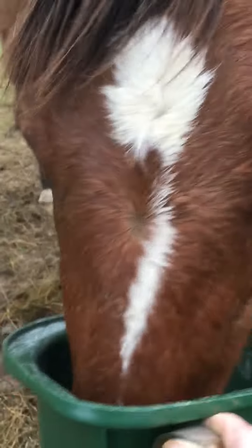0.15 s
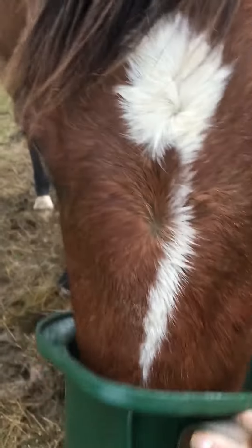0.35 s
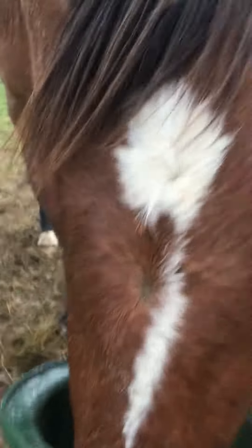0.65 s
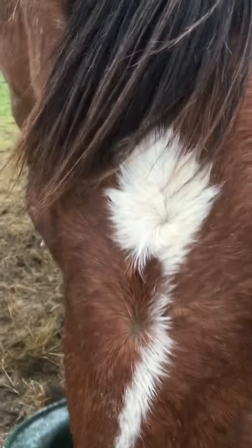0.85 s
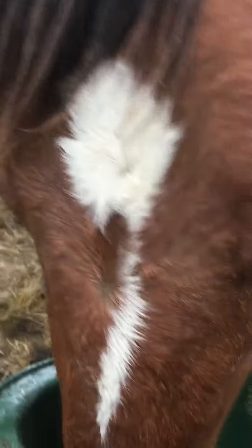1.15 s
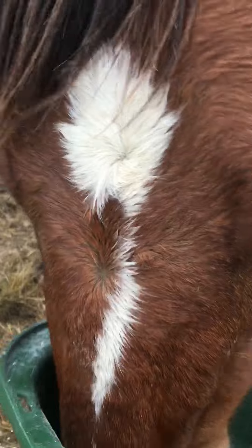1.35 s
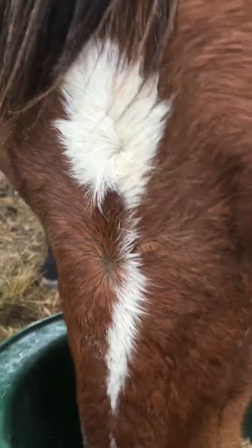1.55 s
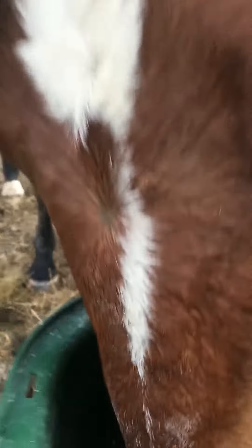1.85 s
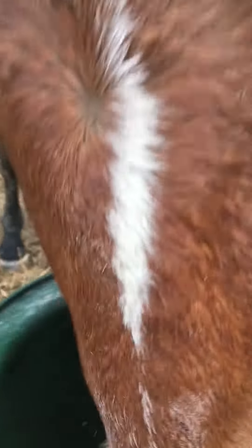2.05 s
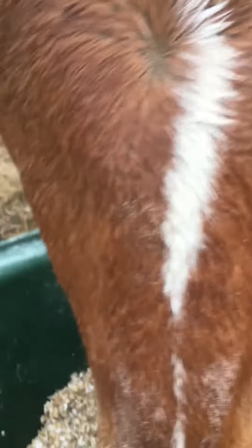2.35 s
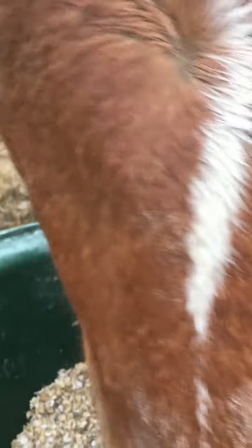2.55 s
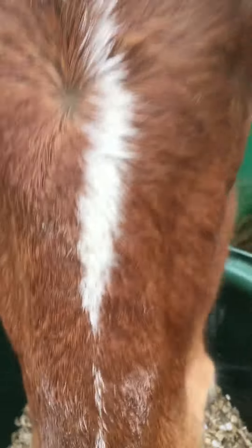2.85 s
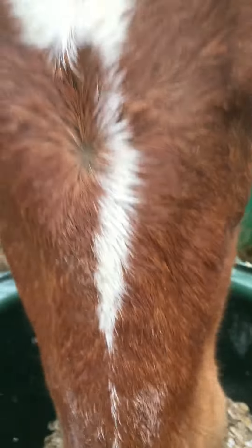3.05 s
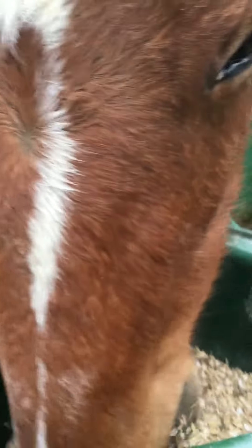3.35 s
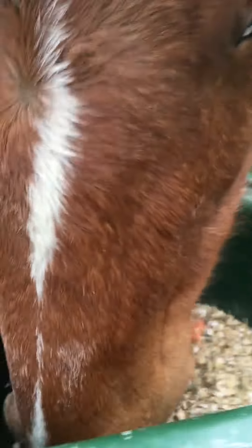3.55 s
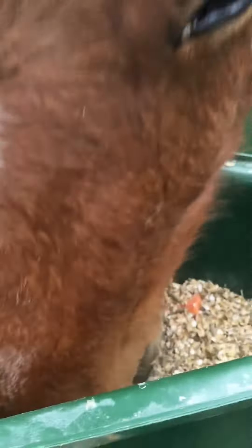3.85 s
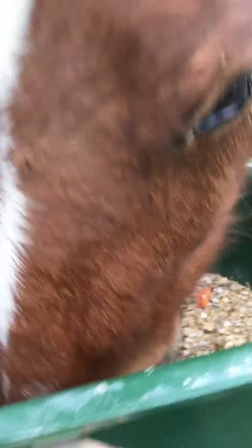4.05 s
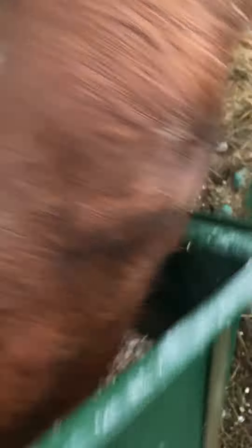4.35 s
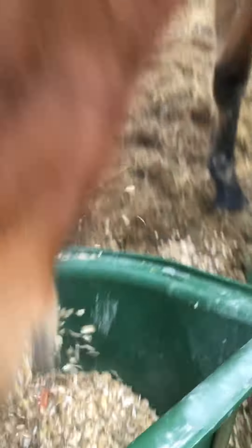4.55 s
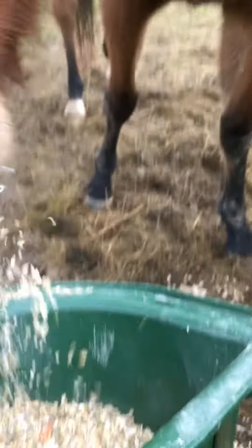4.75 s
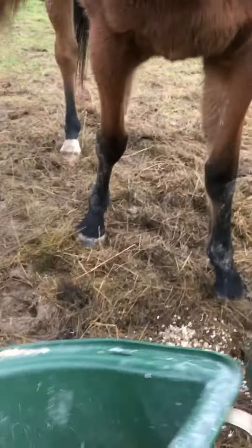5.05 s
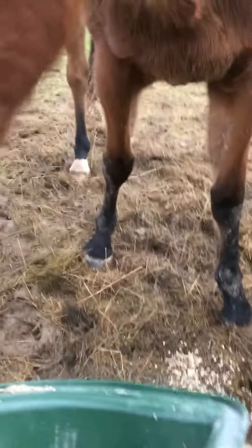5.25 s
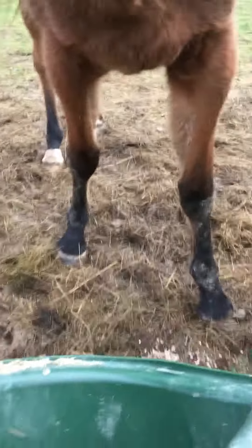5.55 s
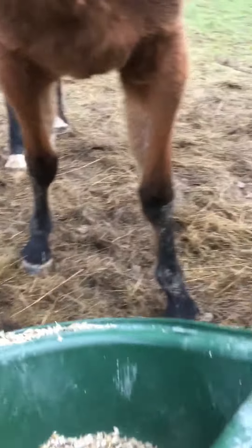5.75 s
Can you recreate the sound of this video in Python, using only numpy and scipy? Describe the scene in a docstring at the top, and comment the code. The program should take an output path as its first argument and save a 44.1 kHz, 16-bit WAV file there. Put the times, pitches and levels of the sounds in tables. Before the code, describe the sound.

A horse eats grain from a plastic bucket in an open field, heard close up over a low outdoor rumble. From the start the grain rustles and scrapes in uneven bursts, kernels snap and tick against the plastic, and the jaw grinds with a low, hollow drone. A cluster of sharp crunches comes near 1.9 seconds. From about 2.3 seconds the muzzle bumps the bucket with dull knocks, clearest at 2.6 and 3.2 seconds, followed by faint wet lip smacks around 3.3 seconds. The loudest knocks fall between 4.2 and 4.4 seconds. At about 4.5 seconds the head lifts out and dropped kernels patter into the bucket, thickest and brightest near 4.85 seconds, then thin to scattered ticks while the chewing goes on softly. From about 5.5 seconds until the end, near 6 seconds, wind gusts buffet the microphone.

```python
"""A horse eats grain from a plastic bucket in an open field, heard close up on a phone microphone.
From the start, over a low outdoor rumble, the grain rustles, kernels snap and tick on the wall and
the grinding jaw drones in the hollow. After two seconds the muzzle bumps the side and the lips smack.
At about 4.5 s the head lifts out, dropped kernels patter down, and last, gusts buffet the microphone."""
import sys
import numpy as np
from scipy import signal
from scipy.io import wavfile
from scipy.ndimage import uniform_filter1d

SR = 44100
rng = np.random.default_rng(int(sys.argv[2]) if len(sys.argv) > 2 else 0)


def to_wav(sig):
    """Store sig (one row per channel, or 1-D mono) as 16-bit WAV at the path in sys.argv[1].

    Samples outside -1..1 are clipped; the rate is SR.
    """
    pcm = np.clip(np.atleast_2d(sig), -1, 1) * 32767
    pcm = np.round(pcm).astype(np.int16)
    wavfile.write(sys.argv[1], SR, pcm.T)  # frames by channels


N = 259742

# Modes of the bucket's wall. Each row: pitch in Hz, level in dB, time to fall 60 dB in seconds.
WALL_MODES = [(140.2, 5.5, 0.095), (182.5, 4.5, 0.14), (220, 6, .1), (325, 2.5, 0.13), (503, 1.5, 0.052),
              (576, -10.5, 0.16), (959, -4, 0.1), (1217, 3.5, 0.0084), (1583, -8, .009), (2040, -10, 0.008),
              (2616, -6, 0.0097), (3260, 0, 0.011), (4050, -18, .008)]
# Shoves of the muzzle and showers of kernels that move the grain.
# Each row: peak time in seconds, length in seconds, fine hiss in dB, coarse scrape in dB.
GRAIN_SHOVES = [(0.171, 0.035, -57.5, -50.5), (0.322, .118, -55, -47), (0.519, 0.06, -66, -49.5),
                (0.63, .154, -54, -54), (0.765, .045, -72, -46.5), (0.913, 0.1, -50.5, -48.5),
                (1.002, 0.058, -52, -51.5), (1.097, .098, -53, -49.5), (1.192, .075, -53, -57.5),
                (1.4, .26, -52.5, -52.5), (1.594, .178, -47, -54), (1.779, .122, -48.5, -61.5),
                (1.901, .065, -42.5, -40.5), (2.298, .07, -52.5, -54.5), (2.599, .071, -50, -49.5),
                (2.829, 0.15, -49.5, -61), (2.982, .119, -53, -62), (3.218, .105, -45, -53.5),
                (3.403, .164, -52, -58), (3.545, .05, -45.5, -47.5), (3.615, 0.05, -52.5, -53.5),
                (3.8, 0.098, -44.5, -53), (3.938, .089, -52, -51), (4.184, .35, -47, -45),
                (4.363, .07, -46.5, -44), (4.447, .123, -47, -45.5), (4.603, .13, -47, -44.5),
                (4.78, .17, -40, -40.5), (4.845, .04, -45, -42), (4.93, .45, -51.5, -53),
                (5.295, 0.08, -41.5, -51), (5.36, .1, -45.5, -52), (5.531, .118, -70, -56.5),
                (5.637, .052, -68, -48.5), (5.785, .16, -68, -55)]
SETTLED_DB = -57.5, -66.5  # hiss and scrape between shoves


def undb(db):
    """Gain of a level in dB."""
    return 10 ** (np.asarray(db) / 20)


def unit(x):
    """Scaled to rms 1."""
    return x / np.sqrt(np.mean(x ** 2))


def add(out, start_s, x):
    """Mix x into out from start_s on."""
    i = int(start_s * SR)
    out[i:i + len(x)] += x[:len(out) - i]


def band(x, hz, width):
    """Steep resonance: a two-pole band-pass applied twice."""
    b, a = signal.iirpeak(hz, hz / width, SR)
    return signal.lfilter(b, a, signal.lfilter(b, a, x))


def ring(x, peaks):
    """Sum of resonances of alternating sign. Each row: centre in Hz, width in Hz, level in dB."""
    return sum((-1) ** k * undb(db) * band(x, hz, 1.57 * width) / np.sqrt(width)
               for k, (hz, width, db) in enumerate(peaks))


def drift(per_s):
    """Smooth random wander of rms 1, with per_s new values a second."""
    hold = int(SR / per_s)
    steps = np.repeat(rng.standard_normal(N // hold + 1), hold)
    return unit(uniform_filter1d(uniform_filter1d(steps, hold), hold)[:N])


def puffs(per_s, spread_db, tail_ms):
    """Noise in short puffs of unequal size, as when kernels slip or are crushed."""
    onsets = rng.random(N) < per_s / SR
    sizes = undb(np.minimum(spread_db * rng.exponential(size=N), 16))
    envelope = signal.lfilter([1], [1, -np.exp(-1000 / (tail_ms * SR))], onsets * sizes)
    return envelope * rng.standard_normal(N)


def swells(table, rest_db):
    """A curve in dB for each level column: every row rises to its peak and falls over a resting level."""
    rise_share, edge_db, roundness = .42, 7, 1.7
    t = np.arange(0, N / SR + .002, .002)
    power = np.ones((1, len(t))) * undb(2 * np.reshape(rest_db, (-1, 1)))
    for peak_s, length_s, *db in table:
        away = np.maximum((peak_s - t) / rise_share, (t - peak_s) / (1 - rise_share)) / length_s
        power = power + undb(2 * (np.reshape(db, (-1, 1)) - edge_db * away ** roundness))
    return [np.interp(np.arange(N) / SR, t, 10 * np.log10(p)) for p in power]


def head_up():
    """0 while the muzzle is in the bucket, 1 once it is out."""
    return np.interp(np.arange(N) / SR, (4.45, 4.65), (0, 1))


def field_air():
    """The open field: faint broad bands of noise, each wavering a little."""
    # Bands of outdoor noise. Each row: centre in Hz, width in Hz, level in dB.
    air_bands = [(143, 160, -55), (385, 1570, -59.5), (930, 366, -62), (4070, 20000, -62)]
    return sum(undb(db + 2.5 * drift(16)) * unit(band(rng.standard_normal(N), hz, width))
               for hz, width, db in air_bands)


def low_rumble():
    """A wavering low rumble; its strongest swells, gusts that buffet the microphone, reach higher."""
    # Swells of low rumble: the bumped bucket shakes at 4.2 s, then wind gusts after 5 s.
    # Each row: peak time in seconds, length in seconds, level in dB.
    rumble_swells = [(4.2, 0.22, -43), (5.2, 0.23, -41.5), (5.52, 0.07, -33.5), (5.69, 0.13, -28),
                     (5.78, 0.06, -27)]
    # Bands of the rumble and of the buffeting. Each row: centre in Hz, width in Hz, relative level in dB.
    rumble_bands = [(53.6, 13, 10), (80, 27, -2)]
    buffet_bands = [(105, 44, 21), (220, 87, 5)]
    rumble_db = swells(rumble_swells, rest_db=-47.5)[0]
    rumble = unit(ring(rng.standard_normal(N), rumble_bands))
    buffet = unit(ring(rng.standard_normal(N), buffet_bands))
    buffet_db = rumble_db - 14 + 0.48 * (rumble_db + 43) + drift(7.1)
    return rumble * undb(rumble_db) + buffet * undb(buffet_db)


def jaw_drone():
    """Dense grinding thuds ring the bucket's hollow, which sounds higher once the head is out."""
    # Grinds of the jaw. Each row: peak time in seconds, length in seconds, level in dB.
    grinds = [(0.03, 0.049, -40), (0.255, 0.1, -42), (0.38, 0.11, -46), (0.628, 0.11, -50),
              (0.796, 0.12, -43.5), (0.926, 0.11, -43.5), (1.147, 0.095, -47.5), (1.41, 0.18, -39),
              (1.579, 0.23, -46.5), (1.9, 0.11, -43.5), (2.184, 0.055, -42), (2.38, 0.33, -45.5),
              (2.826, 0.12, -46.5), (2.974, 0.26, -49.5), (3.24, 0.07, -44.5), (3.437, 0.14, -40),
              (3.537, 0.08, -36), (3.84, 0.26, -45.5), (4.16, 0.16, -33.5), (4.27, 0.29, -42),
              (4.548, 0.13, -42), (4.773, 0.19, -47.5), (5.019, 0.18, -46), (5.326, 0.27, -49.5)]
    # The hollow with the muzzle in, then out. Each row: centre in Hz, width in Hz, relative level in dB.
    blocked_hollow = [(225.7, 74, -2), (280, 82, -6), (450, 124, -18.5)]
    open_hollow = [(272, 173, 6), (474, 77, -9.5)]
    thuds = puffs(per_s=900, spread_db=2, tail_ms=3.7)
    up = head_up()
    hollow = (1 - up) * unit(ring(thuds, blocked_hollow)) + up * unit(ring(thuds, open_hollow))
    return hollow * undb(swells(grinds, rest_db=-59)[0])


def lip_smacks():
    """Short wet rubs of the lips: narrow noise on a gliding pitch."""
    # Each row: start in seconds, length in ms, first and last pitch in Hz, level in dB.
    rubs = [(3.25, 20, 953, 960, -44), (3.368, 25, 1310, 1980, -42), (3.398, 18.6, 2290, 3060, -41)]
    out = np.zeros(N)
    for start_s, ms, first_hz, last_hz, db in rubs:
        n = int(ms * SR / 1000)
        wobble = unit(uniform_filter1d(rng.standard_normal(n), 40))
        glide = np.sin(2 * np.pi * np.cumsum(np.linspace(first_hz, last_hz, n)) / SR)
        add(out, start_s, undb(db) * np.hanning(n) ** .5 * wobble * glide)
    return out


def muzzle_bumps():
    """Each bump rings the wall modes nearest its pitch; low bending waves are slower and arrive late."""
    # Each row: start in seconds, peak in dB, pitch in Hz, rise in ms, share of the free ring time.
    bumps = [(2.282, -25.5, 222, 4.4, 0.77), (2.314, -24.5, 233, 11, 0.34), (2.589, -17, 176, 3.7, 1),
             (2.598, -10.5, 171, 6, 0.39), (2.879, -22.5, 157, 3.6, 0.37), (3.172, -13, 146, 4.1, 0.44),
             (3.34, -24.5, 131, 4.4, 0.4), (3.535, -31, 248, 7.3, 0.49), (3.752, -27, 165, 4.8, 0.1),
             (4.155, -16.5, 259, 4, 0.2), (4.214, -5.5, 228, 3.1, 0.4), (4.229, -8.5, 175, 4.6, 0.37),
             (4.355, -8, 214, 0.93, 0.6), (5.287, -30, 356, 2.4, 0.98)]
    out, t = np.zeros(N), np.arange(6000) / SR
    for start_s, db, pitch_hz, rise_ms, ring_share in bumps:
        bump = 0
        for hz, mode_db, t60 in WALL_MODES:
            age = np.maximum(t - 0.33 / hz, 0)
            attack = np.sin(np.pi / 2 * np.minimum(age * 1000 / rise_ms * hz / pitch_hz, 1)) ** 2
            octaves = np.log2(hz / pitch_hz)
            # a quicker blow reaches more of the high modes
            near_db = -1.4 * rise_ms ** 2 * max(octaves, 0) + 14 * min(octaves, 0)
            # a muzzle that stays on the wall shortens the ring
            decay_db = 60 * age / (ring_share * t60)
            bump = bump + undb(mode_db + near_db - decay_db) * attack * np.sin(2 * np.pi * hz * age)
        add(out, start_s, undb(db) * bump / np.abs(bump).max())
    return signal.sosfilt(signal.butter(4, 112, "high", fs=SR, output="sos"), out)


def grain_rustle():
    """Fine slips hiss and coarser ones scrape the wall; once the head is up, dropped kernels patter."""
    # Bands of the hiss, of the scrape, and of the colour that the muzzle adds while in the grain.
    # Each row: centre in Hz, width in Hz, relative level in dB.
    hiss_bands = [(6540, 4150, -5.5), (8680, 510, -7.5), (11100, 4400, -0.5), (14750, 1800, -2.5)]
    scrape_bands = [(1376, 650, -6.5), (2480, 750, -7.5), (3610, 4800, -7)]
    muzzle_bands = [(900, 640, -9)]
    hiss_db, coarse_db = swells(GRAIN_SHOVES, SETTLED_DB)
    sift = puffs(per_s=4700, spread_db=1.5, tail_ms=0.74)
    # the colour shifts as the muzzle turns: every band drifts alone
    hiss = unit(sum((-1) ** k * undb(1.5 * drift(5)) * ring(sift, [peak])
                    for k, peak in enumerate(hiss_bands)))
    slips = puffs(per_s=1000, spread_db=3, tail_ms=3.5)
    scrape = unit(ring(slips, scrape_bands) - ring(slips, muzzle_bands))
    patter = unit(ring(puffs(per_s=450, spread_db=4, tail_ms=2), scrape_bands))
    up = head_up()
    coarse = (1 - up) * scrape + up * patter
    return hiss * undb(hiss_db + 1.13 * drift(25.05)) + coarse * undb(coarse_db + 3.66 * drift(10))


def small_kernels(count):
    """Random rows for kernel_clicks, more of them and louder where the grain scrapes harder."""
    coarse_db = swells(GRAIN_SHOVES, SETTLED_DB)[1]
    when, size, pitch, brightness = rng.uniform(-0.72, 1, (count, 4)).T
    odds = np.cumsum(undb(.5 * coarse_db))
    starts = np.minimum(np.searchsorted(odds, abs(when) * odds[-1]), N - 1)
    tick_db = coarse_db[starts] + 10 + 4 * size
    tick_hz = 2200 * 2 ** (.9 * pitch)
    snap_db = tick_db - 4 + 6 * brightness
    return list(zip(starts / SR, tick_db, tick_hz, snap_db))


def kernel_clicks():
    """A kernel snaps with a ragged tail, crumbles against the wall and rings the modes near its pitch."""
    # The loudest kernels. Each row: start in seconds, wall tick in dB, its pitch in Hz, snap in dB.
    loud_kernels = [(0.08, -29, 1790, -34), (0.101, -36.5, 2430, -41), (0.3103, -26, 1750, -11.5),
                    (0.3415, -35, 1550, -21.5), (0.523, -29.5, 2480, -17.5), (0.5386, -31, 2060, -53),
                    (0.5745, -38, 3230, -26), (0.653, -40.5, 3000, -40), (0.7228, -25.5, 1840, -26),
                    (0.7484, -24, 3330, -26), (0.7613, -32, 1390, -36), (0.768, -26.5, 2900, -44),
                    (0.786, -32, 1190, -34), (0.886, -40, 1250, -58), (1.062, -28, 1320, -10),
                    (1.076, -27, 2300, -31), (1.1196, -22.5, 2040, -19), (1.3197, -33, 2930, -53),
                    (1.3718, -20.5, 1540, -26), (1.437, -31.5, 2900, -55), (1.477, -33, 1190, -45),
                    (1.4833, -26, 3930, -14.5), (1.8713, -25, 1370, -21.5), (1.8745, -41, 3500, -29),
                    (1.8886, -19.5, 2180, -24), (1.8928, -22.5, 3000, -17), (1.9069, -22.5, 1430, -44),
                    (1.919, -32, 1450, -16), (1.9255, -24, 1390, -12), (2.281, -33.5, 1450, -50),
                    (2.31, -39, 1280, -57), (2.5281, -39, 3430, -36), (2.7091, -43, 2280, -57),
                    (2.7346, -43, 2000, -53), (2.833, -28, 2980, -50), (2.852, -34, 3130, -40),
                    (3.339, -39, 1470, -45), (3.5314, -32, 970, -39), (3.637, -38.5, 3300, -50),
                    (3.7356, -29.5, 1070, -55), (3.829, -34.5, 1180, -46), (3.869, -36, 2490, -37),
                    (3.895, -35, 1210, -37), (3.937, -27.5, 1240, -29.5), (3.967, -34, 1020, -51),
                    (3.976, -40, 3530, -41), (4.052, -33, 1890, -50), (4.167, -30, 2820, -30),
                    (4.356, -18.5, 890, -47), (4.443, -30, 1320, -25), (4.545, -30, 3000, -37),
                    (4.556, -24.5, 3280, -26), (4.5629, -18, 2520, -21.5), (4.565, -21, 1690, -28),
                    (4.594, -28.5, 1640, -35), (4.606, -27, 1530, -27.5), (4.655, -29.5, 2030, -27),
                    (4.7, -31, 2300, -31), (4.7158, -33, 2800, -20), (4.747, -32, 2210, -39),
                    (4.7578, -28.5, 1400, -15.5), (4.764, -33, 1380, -33), (4.778, -23, 1940, -30),
                    (4.789, -28, 3920, -22), (4.8008, -25, 1590, -42), (4.815, -32, 1700, -31),
                    (4.8293, -32, 3280, -15.5), (4.8364, -32.5, 1360, -22), (4.8493, -21.5, 1330, -8),
                    (4.854, -21, 3050, -5), (4.86, -24.5, 3000, -11.5), (4.886, -44, 3050, -16.5),
                    (4.899, -30.5, 3900, -37), (4.938, -35, 1600, -46), (4.956, -31.5, 2900, -18.5),
                    (4.976, -32, 2600, -50), (4.9937, -47, 2890, -23), (5.0321, -28, 3580, -12),
                    (5.0363, -23, 3600, -9), (5.0725, -36.5, 3500, -32), (5.117, -31.5, 3200, -37),
                    (5.192, -33.5, 3560, -36), (5.258, -41, 4500, -24), (5.276, -30, 4200, -29),
                    (5.2924, -30.5, 3300, -37), (5.359, -42, 4400, -20), (5.4244, -19, 4200, -22),
                    (5.494, -38, 3210, -37), (5.513, -35.5, 2880, -34), (5.6215, -25.5, 1690, -25.5),
                    (5.772, -37, 2490, -28.5)]
    out, t = np.zeros(N), np.arange(1024) / SR
    impulse = signal.unit_impulse(len(t), idx=8)
    for start_s, tick_db, tick_hz, snap_db in loud_kernels + small_kernels(count=45):
        # a snap that stands out more over its tick is also higher
        snap_hz = np.clip(7600 * 2 ** (0.07 * (snap_db - tick_db)), 6400, 14000)
        noise, crumble = rng.standard_normal((2, len(t)))
        crack = impulse + noise * undb(-13) * np.exp(-t / .0004)
        tail = noise * undb(-17.5) * np.exp(-t / .0033)
        snap = band(crack + tail, snap_hz, 1.025 * snap_hz)
        push = impulse + undb(-15) * crumble * np.exp(-t / .003)
        # the weaker the snap, the wetter the bite and the narrower its tick
        wet = np.clip((tick_db - snap_db) / 20, 0, 1)
        tick = undb(-4 - 10 * wet) * band(push, tick_hz, 1.2 * tick_hz)
        for k, (hz, _, _) in enumerate(WALL_MODES[6:]):
            octaves = np.log2(hz / tick_hz)
            near_db = -4 * octaves - (7 + 8 * wet) * abs(octaves)
            spot_hz = hz * (1 + .05 * noise[k])  # each spot on the wall shifts the modes a little
            tick = tick + (-1) ** k * undb(near_db) * band(push, spot_hz, .2 * hz)
        add(out, start_s, undb(snap_db) * snap / np.abs(snap).max())
        add(out, start_s, undb(tick_db) * tick / np.abs(tick).max())
    return out


def scene():
    """The horse at its bucket and the field around it, all at one close microphone."""
    horse = grain_rustle() + kernel_clicks() + lip_smacks() + muzzle_bumps() + jaw_drone()
    return (horse + low_rumble() + field_air())[None]


def record(dry):
    """The phone colours the treble and cuts the deepest bass and the very top."""
    # Dips and a lift in the microphone's treble. Each row: centre in Hz, width in Hz, gain in dB.
    mic_colour = [(4840, 720, -5), (10470, 830, -4.5), (14700, 8900, 2.5)]
    low_cut_hz, top_hz = 33, 15800
    y = signal.sosfilt(signal.butter(3, low_cut_hz, "high", fs=SR, output="sos"), dry)
    for hz, width, db in mic_colour:
        y = y + (undb(db) - 1) * signal.lfilter(*signal.iirpeak(hz, hz / width, SR), y)
    return signal.sosfilt(signal.ellip(12, .3, 70, top_hz, fs=SR, output="sos"), y)


dry = scene()
out = record(dry)
to_wav(out)
```